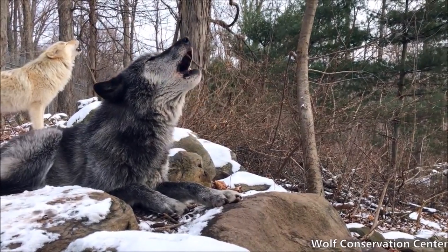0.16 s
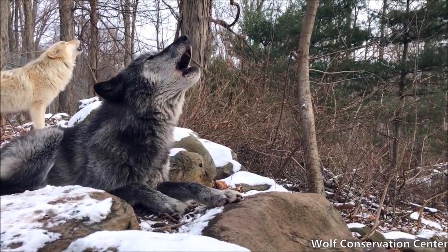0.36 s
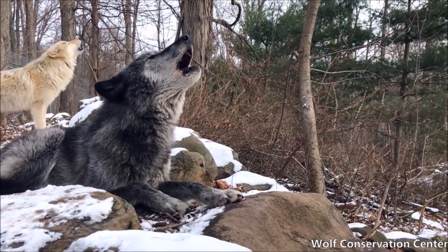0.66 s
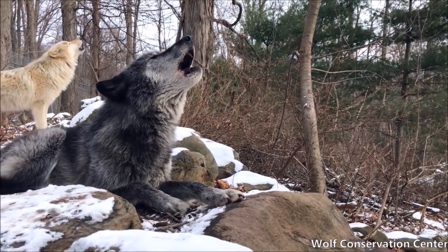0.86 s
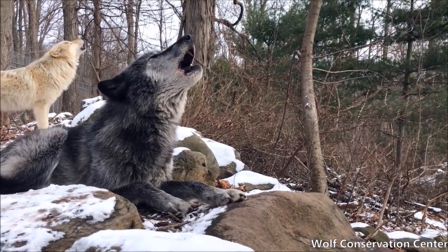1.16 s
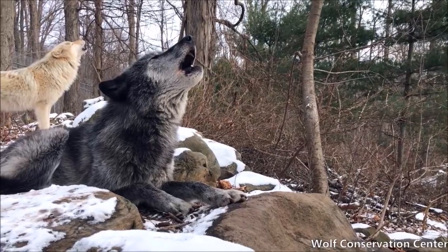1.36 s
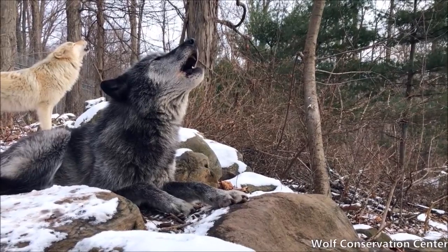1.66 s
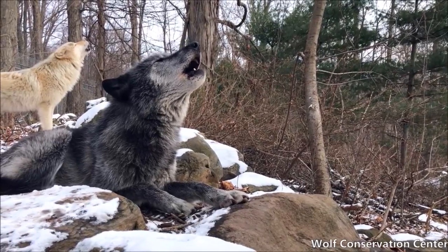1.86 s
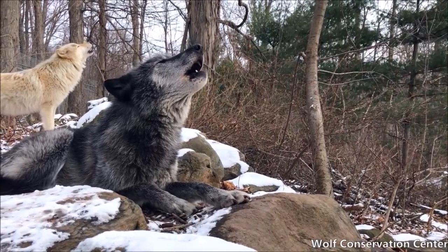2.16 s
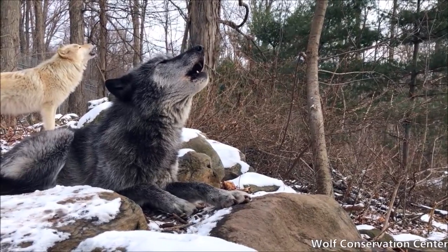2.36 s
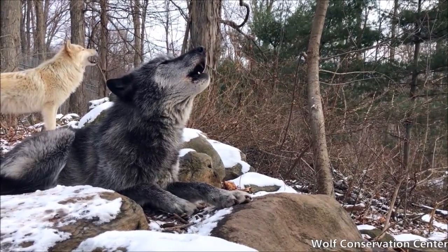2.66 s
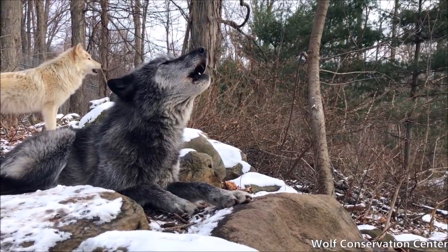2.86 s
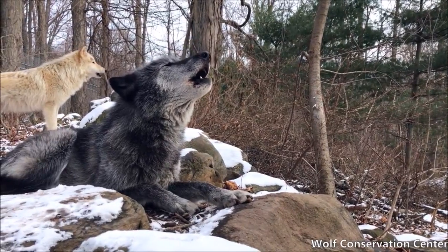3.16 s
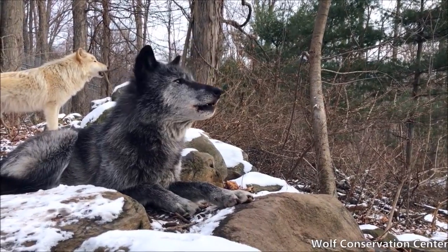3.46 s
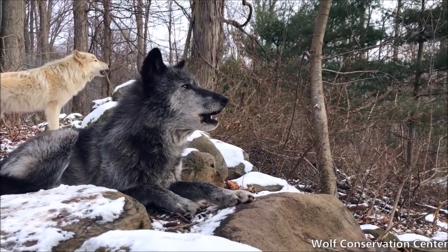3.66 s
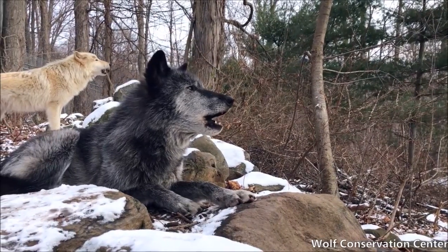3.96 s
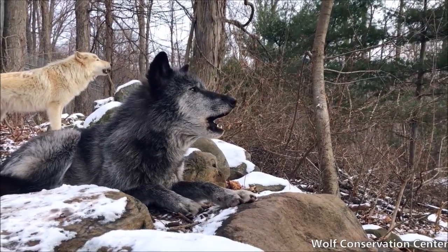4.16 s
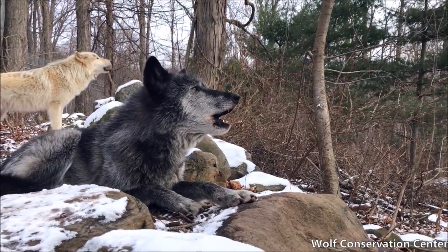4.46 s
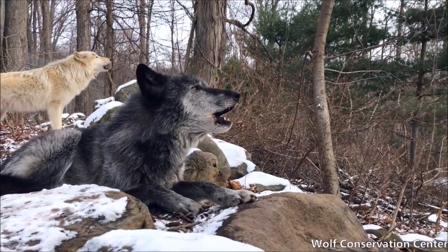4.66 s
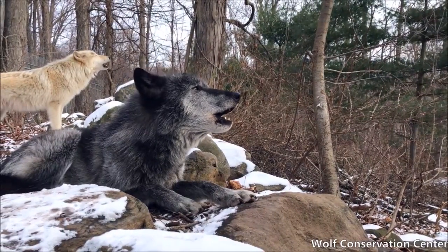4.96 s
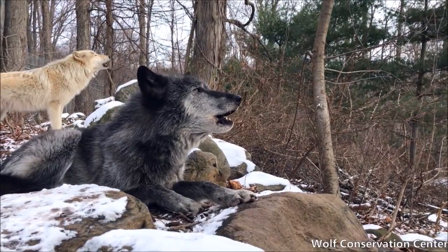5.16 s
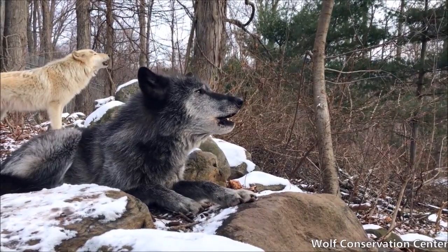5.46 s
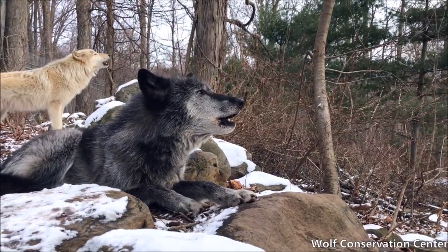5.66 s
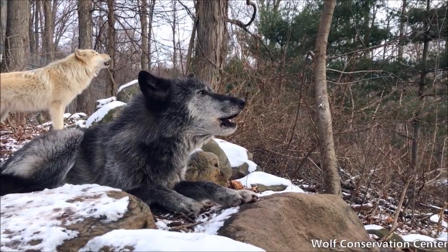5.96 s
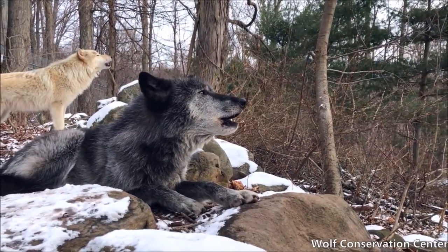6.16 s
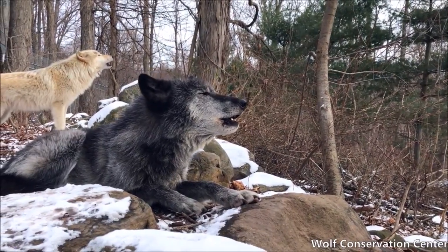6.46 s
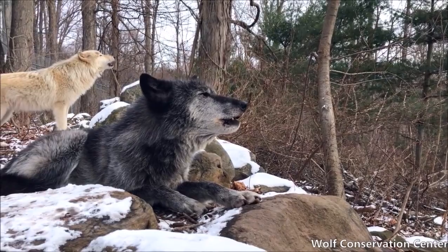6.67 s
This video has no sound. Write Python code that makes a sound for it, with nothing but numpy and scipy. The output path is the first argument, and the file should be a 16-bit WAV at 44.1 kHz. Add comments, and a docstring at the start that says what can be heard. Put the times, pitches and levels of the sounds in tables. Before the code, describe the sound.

Outdoor wolf chorus picked up close to one animal. Its clear, strong howl starts high, drops with a register break to a sustained steady tone, sinks briefly, then leaps up and stops. Around it a farther, less steady wolf sags, cracks, rasps and wavers with woodland echo, while a third is barely audible at first. Finally the near wolf adds a brief, duller falling howl. Faint low rumble, slight hiss and tiny soft thumps lie underneath.

```python
"""From the start a wolf some way off in the wood howls thin and high, while faint high whistles sound. A third,
far away, holds one faint note that sinks a little and stops. After a moment a near wolf breaks in high, drops
to a long note, dips and rises. The farther wolf returns hoarse, flips between registers and quavers; last, the
near one gives a short falling howl. The howls are stacks of sine partials, scattered by echoes from tree
trunks; rasp, a low rumble, a little hiss and soft thumps are shaped noise."""
import sys
import numpy as np
from scipy import signal
from scipy.fft import rfft, irfft
from scipy.io import wavfile
from scipy.ndimage import uniform_filter1d

SR = 44100
rng = np.random.default_rng(int(sys.argv[2]) if len(sys.argv) > 2 else 0)


def output_pcm(signal):
    """Save a mono or channel-first signal as 16-bit PCM at the path in sys.argv[1].

    Samples are clipped to [-1, 1] before scaling.
    """
    pcm = np.clip(np.atleast_2d(signal).T, -1, 1) * 32767
    wavfile.write(sys.argv[1], SR, np.round(pcm).astype(np.int16))


N = 300762
TIME = np.arange(N) / SR  # s
CUTOFF_HZ = 15500  # nothing sounds above this

# hoarseness of the farther wolf's vocal folds, which also lifts the rasp: t/s, roughness/0-1
FAR_HOARSENESS = [(2.1, 0), (2.55, 0.35), (2.61, 0.11), (2.95, 0.13), (3.021, 0.63), (3.22, 0.49),
                  (3.28, 0.037)]


def from_db(db):
    """Decibels to gain."""
    return 10 ** (np.asarray(db) / 20)


def rms_one(x):
    """Scale to unit rms."""
    return x / np.sqrt(np.mean(x ** 2) + 1e-20)


def in_time(rows):
    """Each column of a curve table after the first, read in straight lines at every sample."""
    s, *columns = np.transpose(rows)
    return [np.interp(TIME, s, column) for column in columns]


def at_hz(points, hz):
    """Read a spectrum in dB on a log-frequency axis."""
    knots, db = np.transpose(points)
    return np.interp(np.log(hz), np.log(knots), db)


def during(start, end, size=700):
    """1 between two times and 0 outside, with edges softened over `size` samples."""
    return uniform_filter1d(1. * (TIME >= start) * (TIME < end), size=size)


def low_pass(x, hz, order=2):
    """Butterworth low-pass."""
    return signal.sosfilt(signal.butter(order, min(hz, SR / 2 - 1), fs=SR, output="sos"), x)


def drift(rate, size=20):
    """Slow random wander of rms 1, holding motion up to about `rate` Hz; drawn at every `size`-th sample."""
    draws = rng.standard_normal((N + SR) // size)
    slow = low_pass(draws, rate * size)[SR // size:]  # drop the filter's start
    return np.interp(np.arange(N) / size, np.arange(len(slow)), rms_one(slow))


def noise(spectrum):
    """Noise of a given colour, rms 1."""
    hz = np.arange(N // 2 + 1) * SR / N + 1  # the 1 keeps the logarithm finite
    white = rfft(rng.standard_normal(N))
    return rms_one(irfft(white * from_db(at_hz(spectrum, hz)), N))


def glide(tune):
    """Pitch passes through the points of a tune in rounded arcs, without overshoot."""
    s, hz = np.transpose(tune)
    step = np.diff(s)
    rise = np.diff(hz) / step
    a, b = rise[:-1], rise[1:]
    # harmonic mean of the neighbouring slopes, flat at peaks and dips
    inner = np.where(a * b > 0, 2 * a * b / (a + b + 1e-9), 0)
    slope = np.r_[rise[0], inner, rise[-1]]
    place = np.interp(TIME, s, np.arange(len(s)))
    k = np.minimum(place.astype(int), len(step) - 1)
    u = place - k
    bend = (slope[k] - rise[k]) * (1 - u) - (slope[k + 1] - rise[k]) * u
    return hz[k] + step[k] * u * (rise[k] + (1 - u) * bend)


def howl(tune, effort, mouths, throat, high_spans, rough_curve, waver, shimmer_db, flutter_db, top_db,
         vibrato=1, octave_db=0, twelfth_db=0, rings=(), crack=.6, count=24):
    """Vocal folds give a harmonic stack; the mouth weights the low partials, the throat the high ones."""
    start, end = tune[0][0], tune[-1][0]
    now = (TIME >= start) & (TIME <= end + .01)
    pitch = (glide(tune) * vibrato)[now]
    level_db, bright_db = [column[now] for column in in_time(effort)]
    high = sum(during(*span) for span in high_spans)[now]
    # the voice cracks as it flips from one register to the other
    rough = in_time(rough_curve)[0][now] + crack * high * (1 - high)
    # the folds never hold perfectly still, least of all in the high register
    pitch = pitch * (1 + waver * (1 + high) * drift(22)[now])
    phase = 2 * np.pi * np.cumsum(pitch) / SR
    # hoarse folds alternate long and short cycles and stumble at random
    phase = phase + rough * (.13 * np.sin(phase / 2) + .22 * drift(190)[now])

    # the three strong partials swell and fade as the tune carries them through the mouth's resonances
    voice = 0
    for k, own_db in enumerate((0, octave_db, twelfth_db), 1):
        colour_db = high * at_hz(mouths[0], k * pitch) + (1 - high) * at_hz(mouths[1], k * pitch)
        colour_db += np.broadcast_to(own_db, N)[now]
        colour_db += shimmer_db / k * high * drift(31)[now]
        voice = voice + from_db(level_db + colour_db) * np.sin(k * phase)

    # the upper overtones take the colour of the register being sung
    throat = np.array(throat)
    boosts = [(ring_hz, db * during(a, b)[now]) for a, b, ring_hz, db in rings]
    for k in range(4, count):
        hz = k * pitch
        colour_db = high * at_hz(throat[:, [0, 1]], hz) + (1 - high) * at_hz(throat[:, [0, 2]], hz)
        colour_db += sum(db / (1 + ((hz - ring_hz) / 150) ** 2) for ring_hz, db in boosts)
        # level off above the throat's last resonance; each overtone flutters in its own way
        colour_db = np.where(hz < throat[-1, 0], colour_db, top_db)
        colour_db = colour_db + flutter_db * drift(9)[now]
        gain = from_db(level_db + bright_db + colour_db) * (hz < CUTOFF_HZ)
        voice = voice + gain * np.sin(k * phase + rng.uniform(0, 2 * np.pi))

    out = np.zeros(N)
    out[now] = np.sqrt(2) * voice
    edges = np.clip(np.minimum(TIME - start, end + .01 - TIME) / .01, 0, 1)  # 10 ms fades
    return out * edges


def far_wolf():
    """The wolf some way off has a less steady voice: two howls that break between registers and quaver."""
    # a thin high howl that sags and lifts near its end; a sudden step is a register break: t/s, f/Hz
    first_tune = [(0.0, 625), (0.176, 612.6), (0.294, 602), (0.365, 626.5), (0.474, 561), (0.645, 540.6),
                  (0.689, 559), (0.839, 508), (0.955, 489.7), (1.09, 499), (1.319, 505), (1.375, 532),
                  (1.55, 525), (1.657, 497.4), (1.755, 615), (1.814, 594.5), (1.96, 644), (2.002, 505),
                  (2.06, 467)]
    # effort before the mouth's colour: t/s, level/dB, upper overtones against that level/dB
    first_effort = [(0, -30.5, -19), (0.169, -32.5, -12.5), (0.35, -29, -15), (0.46, -40, -19),
                    (0.62, -43, -6.5), (0.901, -44, -11), (1.3, -42.0, -13), (1.422, -37, -9),
                    (1.549, -39, -7.5), (1.66, -41, -11), (1.779, -33, -23.5), (1.95, -33, -18.5),
                    (2.06, -52, -2.5)]
    # starts low and hoarse, then flips between registers: t/s, f/Hz
    second_tune = [(2.502, 448.2), (2.553, 525), (2.565, 429.7), (2.73, 400.4), (2.79, 338.3), (2.872, 328),
                   (2.973, 358.6), (3.147, 347.2), (3.231, 367.5), (3.255, 435.5), (3.376, 405),
                   (3.446, 444.6), (3.509, 457), (3.538, 496), (3.775, 487.3), (4.111, 492), (4.355, 459.3),
                   (4.569, 467), (4.603, 548.4), (4.725, 554), (4.776, 545.7), (4.894, 561), (4.948, 606.5),
                   (5.035, 543), (5.11, 552), (5.418, 533.7), (5.734, 525.6), (5.825, 461.5),
                   (5.941, 435.8), (6.146, 422.0), (6.368, 435.5), (6.38, 506.4), (6.715, 536.5),
                   (6.82, 524)]
    # effort, as above: t/s, level/dB, upper overtones against that level/dB
    second_effort = [(2.502, -46, -19), (2.561, -37, -18), (2.701, -44.5, -15), (2.8, -39.5, -11.5),
                     (3.12, -42, -18.5), (3.3, -43, -9.5), (3.52, -38.5, -6.5), (3.7, -33.5, -11.5),
                     (3.949, -36, -13.5), (4.2, -40.5, -5), (4.401, -36.5, -12.5), (4.56, -35.5, -11),
                     (4.62, -37.5, -12), (4.85, -37, -20), (4.95, -31, -9), (5.05, -36.5, -13),
                     (5.701, -36.5, -7.5), (5.95, -36.5, -16.5), (6.15, -40, -11.5), (6.34, -34.5, -20.5),
                     (6.419, -46, 0), (6.82, -42.5, -8.5)]
    # mouth's colour on the first three partials, high and low register: f/Hz, level/dB
    mouth_high, mouth_low = [(490, -11.5), (550, -17), (615, -11.5), (980, -6), (1100, -7), (1240, -7),
                             (1480, -9.5), (1620, -14.5), (1850, -28.5)], [(330, -6.5), (430, 2), (490, -1.5), (540, -9.5),
                                                     (655, -1), (700, -11.5), (820, 0), (880, -11.5),
                                                     (1000, -8.5), (1290, -6.5), (1390, -4.5), (1500, -16)]
    # throat and muzzle's colour on the upper overtones: f/Hz, high register level/dB, low register level/dB
    throat_colour = [(1320, -8, 1.5), (1775, -18, -17.5), (2140, -34.5, -22.5), (2230, -38, -30.5),
                     (2640, -34.5, -39.5), (3100, -30.5, -26), (3720, -21.5, -25.5), (3900, -32.5, -39),
                     (4520, -31.5, -32.5), (5000, -42.5, -36.5), (6210, -38.5, -42), (6610, -27, -31),
                     (6900, -44.5, -47.5), (9800, -53, -63)]
    # stretches in the high register: from t/s, to t/s
    high_stretches = [(0, 1.96), (4.585, 5.8), (6.37, 7.9)]
    # the mouth briefly rings, lifting overtones near one pitch: from t/s, to t/s, f/Hz, boost level/dB
    mouth_rings = [(2.76, 3.55, 1810, 17), (2.95, 3.27, 3420, 14.5), (5.86, 6.36, 2127, 8.5)]
    voice = dict(mouths=(mouth_high, mouth_low), throat=throat_colour, high_spans=high_stretches,
                 rough_curve=FAR_HOARSENESS, waver=.0012, shimmer_db=3.0, flutter_db=3.0, top_db=-57.5,
                 vibrato=quaver(), rings=mouth_rings)
    return howl(first_tune, first_effort, **voice) + howl(second_tune, second_effort, **voice)


def whistles(waver):
    """High, slightly unsteady sine squeaks on top of the voice, unrelated to the howl's pitch."""
    # from t/s, to t/s, f/Hz, level/dB
    squeaks = [(0, 0.355, 6480, -72), (4.576, 4.874, 6574, -68)]
    out = np.zeros(N)
    for start, end, hz, level_db in squeaks:
        phase = 2 * np.pi * np.cumsum(hz * (1 + waver * drift(32))) / SR
        out += from_db(level_db) * during(start, end) * np.sin(phase)
    return np.sqrt(2) * out


def distant_howl():
    """Only the fundamental carries from far away: one wandering sine that fades out."""
    # t/s, f/Hz, level/dB
    faint_note = [(0, 424, -62.5), (1.7, 413, -71)]
    pitch, level_db = in_time(faint_note)
    fade = np.clip((faint_note[-1][0] - TIME) * 10, 0, 1)
    tone = np.sin(2 * np.pi * np.cumsum(pitch) / SR)
    return np.sqrt(2) * fade * from_db(level_db + drift(7.2)) * tone


def rasp():
    """Airy noise in the voices, swelling where the farther one turns hoarse."""
    # before the hoarse swell: t/s, level/dB
    breath_level = [(0, -52.5), (.38, -56), (.6, -68), (1.4, -58), (2.3, -65.5), (3.3, -64.5),
                    (4.55, -65.5), (4.62, -59.5), (5.75, -63.5), (5.95, -69)]
    # relative density: f/Hz, level/dB per Hz
    breath_colour = [(310, -17), (480, 0.5), (1200, -3), (2050, -10), (2550, -22), (3350, -13),
                     (4050, -20.5), (4700, -19), (5800, -26), (6600, -21.5), (10500, -32), (15000, -28.5)]
    hoarse_swell_db = 6.5 * in_time(FAR_HOARSENESS)[0]
    return from_db(in_time(breath_level)[0] + hoarse_swell_db + drift(16)) * noise(breath_colour)


def wood_floor(level_db):
    """Steady background of the wood: noise with a low rumble and a little hiss."""
    # relative density: f/Hz, level/dB per Hz
    floor_colour = [(25, -19.5), (45, -2.5), (70, 1), (110, -9), (180, -16.5), (1200, -15.5), (2500, -41),
                    (15000, -45)]
    return from_db(level_db) * noise(floor_colour)


def wood(x, t60, dull_hz, first_s, count=900):
    """Many faint echoes from trunks: random taps of unit energy together, weaker with delay, then dulled."""
    delays = first_s + rng.random(count) * t60
    echoes = np.zeros(int(delays.max() * SR) + 1)
    echoes[(delays * SR).astype(int)] = rng.standard_normal(count) * from_db(-60 * delays / t60)
    scattered = signal.fftconvolve(x, echoes / np.linalg.norm(echoes))[:N]
    return low_pass(scattered, dull_hz, order=1)


def thumps(decay_s, body_hz, tick_db):
    """Each thump is a short, decaying burst of dull noise with a faint white tick on top."""
    # onset t/s, level of the dull body at onset/dB
    thump_onsets = [(0.157, -61), (0.352, -52), (1.334, -54), (5.733, -51), (5.796, -41)]
    burst = sum(from_db(db) * (TIME >= s) * np.exp(-np.abs(TIME - s) / decay_s) for s, db in thump_onsets)
    grit = rng.standard_normal(N)
    body = rms_one(low_pass(grit, body_hz))
    return burst * (body + from_db(tick_db) * grit)


def near_wolf():
    """The near wolf has a steady, pure voice: one long howl and a short, duller one."""
    # breaks in high, drops to a long note, dips and climbs; a sudden step is a register break: t/s, f/Hz
    long_tune = [(0.325, 863.5), (0.35, 803), (0.512, 779.4), (0.702, 764.0), (0.808, 705.0), (0.96, 611),
                 (1.01, 651), (1.128, 664), (1.232, 627.3), (1.376, 612.3), (1.462, 525), (1.474, 489),
                 (1.674, 458.0), (1.864, 443.6), (2.125, 430.8), (2.405, 434.5), (2.602, 430),
                 (2.902, 430.1), (3.122, 436.0), (3.307, 427.6), (3.444, 404.5), (3.458, 316.8),
                 (3.536, 271.0), (3.596, 265.8), (3.73, 360.4), (3.846, 428.4), (3.911, 442.7),
                 (3.967, 422.6), (4.028, 486.6), (4.174, 541.6), (4.284, 530.0), (4.41, 542.5)]
    # effort before the mouth's colour: t/s, level/dB, upper overtones against that level/dB
    long_effort = [(0.328, -40, 2.5), (0.352, -17.0, -1.5), (0.42, -17.5, -4.5), (0.58, -22, -9.5),
                   (0.73, -23.5, -3.5), (0.82, -32.5, -3), (0.94, -35.5, 2), (1.05, -30.5, -0.5),
                   (1.38, -31.0, 1), (1.46, -32.5, 1.5), (1.491, -28.5, 4.5), (1.62, -26.5, -14.5),
                   (1.799, -26.5, -16.5), (2.3, -24, -13.5), (3.199, -25.5, -15.5), (3.42, -27.5, -16),
                   (3.46, -36, -23.5), (3.6, -40, -12), (3.7, -33.0, -27), (3.77, -36.5, -16),
                   (3.87, -28, -16), (3.98, -33, -11.5), (4.03, -24.0, -27.5), (4.161, -34.5, -6),
                   (4.23, -29, -11), (4.33, -28.5, -7), (4.375, -44, -9), (4.411, -84, 14)]
    # the short falling howl: t/s, f/Hz
    short_tune = [(6.21, 484.6), (6.255, 436.5), (6.388, 431.1), (6.583, 405), (6.82, 368)]
    # effort, as above: t/s, level/dB, upper overtones against that level/dB
    short_effort = [(6.211, -47, -22), (6.255, -30.5, -31), (6.4, -31, -29), (6.55, -30.5, -22),
                    (6.741, -32.5, -37), (6.82, -36.5, -20)]
    # mouth's colour on the first three partials, high and low register: f/Hz, level/dB
    mouth_high, mouth_low = [(660, 0.5), (790, 0), (1070, -8.5), (1240, 3), (1330, -6), (1490, -36.5),
                             (1590, -28), (1880, -33.5), (2250, -64.5), (2410, -29.5)], [(500, 0.0), (535, -19), (640, -26.5), (740, -5.5),
                                                      (810, -2), (870, -5), (920, -1.5), (1040, -12),
                                                      (1200, -12.5), (1300, -11.5), (1360, -16.5),
                                                      (1500, -19.5)]
    # throat and muzzle's colour on the upper overtones: f/Hz, high register level/dB, low register level/dB
    throat_colour = [(1150, 0, 8), (1500, -8, -3), (1780, -6.5, -21.5), (2225, -39, -27),
                     (2340, -47, -56.5), (2690, -27, -48), (3263, -33, -24), (3340, -57, -58),
                     (4950, -51.5, -45.5), (5430, -41.5, -55), (5900, -67, -65.5), (6900, -55, -61.5),
                     (9200, -56, -59), (10000, -71.5, -68.5)]
    # stretches in the high register: from t/s, to t/s
    high_stretches = [(.3, 1.468), (4.06, 4.43)]
    # hoarseness of the folds: t/s, roughness/0-1
    hoarseness = [(3.42, 0), (3.46, .3), (3.58, 0)]
    # the octave of the long note slowly fades and returns: t/s, level/dB
    octave_fade = [(2.0, -1.5), (2.75, -15.5), (3.14, -13), (3.38, -5)]
    short_dull_db = -12.5  # on the octave and twelfth of the short howl
    voice = dict(mouths=(mouth_high, mouth_low), throat=throat_colour, high_spans=high_stretches,
                 rough_curve=hoarseness, waver=0.00042, shimmer_db=0.46, flutter_db=3.5, top_db=-75)
    long_howl = howl(long_tune, long_effort, octave_db=in_time(octave_fade)[0], **voice)
    short_howl = howl(short_tune, short_effort, octave_db=short_dull_db, twelfth_db=short_dull_db, **voice)
    return long_howl + short_howl


def quaver():
    """Pitch factor of the quick, shallow vibrato on the farther wolf's high notes."""
    # from t/s, to t/s
    quaver_spans = [(5.13, 5.72), (6.47, 6.9)]
    rate_hz, depth = 8.0, .013  # depth as a fraction of the pitch
    return 1 + depth * sum(during(a, b) * np.sin(2 * np.pi * rate_hz * (TIME - a)) for a, b in quaver_spans)


def scene():
    """One microphone in the wood hears the farther wolf with more of the trees' echo than the near one."""
    far, near = far_wolf(), near_wolf()
    faint = whistles(waver=0.0045) + distant_howl()
    echoes = wood(from_db(-16) * far + from_db(-31.0) * near, t60=1.1, dull_hz=3360, first_s=0.011)
    background = wood_floor(level_db=-67) + thumps(decay_s=0.0077, body_hz=260, tick_db=-25.0)
    return (far + near + faint + rasp() + echoes + background)[None]


def record(dry):
    """The top is cut steeply at the microphone, by an elliptic low-pass."""
    return signal.sosfilt(signal.ellip(10, .1, 90, CUTOFF_HZ, fs=SR, output="sos"), dry)


dry = scene()
out = record(dry)
output_pcm(out)
```